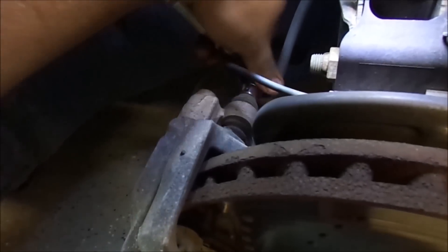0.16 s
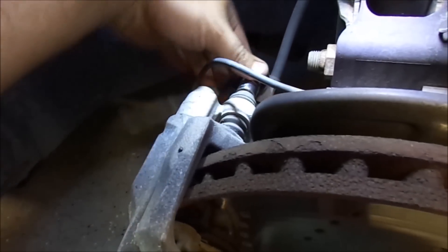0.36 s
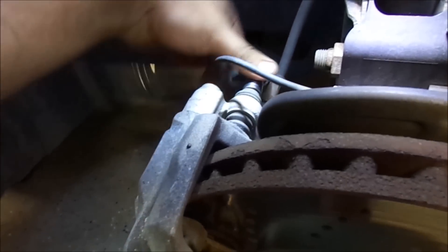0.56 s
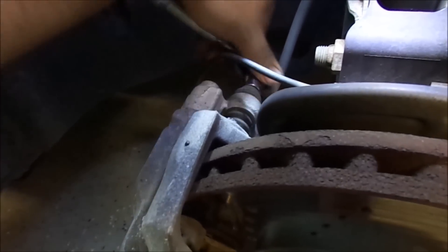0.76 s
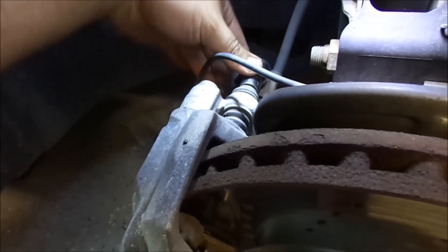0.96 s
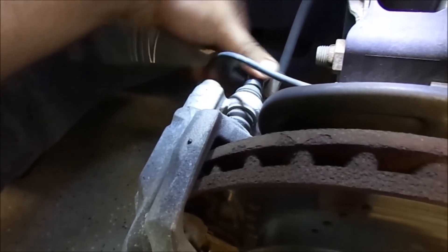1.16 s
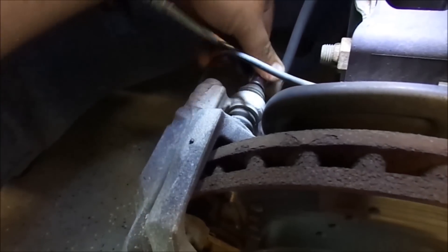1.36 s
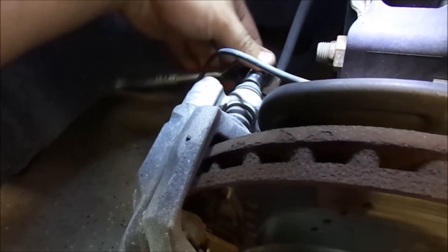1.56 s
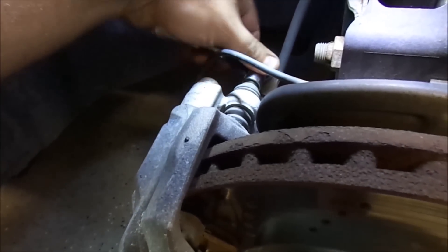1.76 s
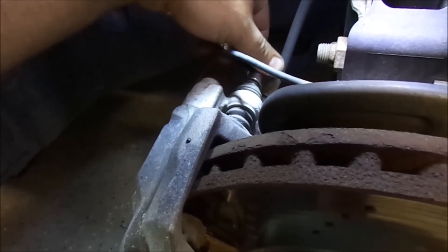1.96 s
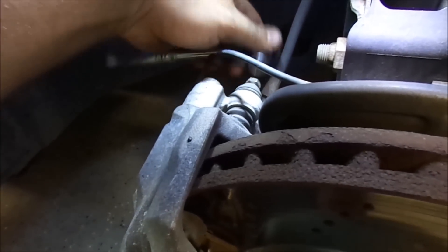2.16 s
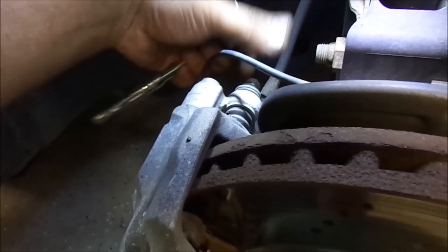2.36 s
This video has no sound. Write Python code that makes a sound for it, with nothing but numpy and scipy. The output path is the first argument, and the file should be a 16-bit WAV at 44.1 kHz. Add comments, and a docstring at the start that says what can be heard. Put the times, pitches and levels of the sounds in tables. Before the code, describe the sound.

A ratchet wrench clicks rapidly in three bright metallic runs, then three slower clicks, with soft knocks and faint hand scuffing between; close microphone in a garage with short reflections and quiet air.

```python
"""In a garage, close to a small camera, light knocks and a hand scuffing metal lead into a ratchet wrench
swung back four times on a brake bolt, the last swing only three clicks long. At each tooth a noise snap
and rattle join the decaying modes of pawl, wrench and brake iron; softer knocks wake the same modes between
swings and after the last. Shaped noise makes the scuff and, all through, the air behind a faint wavering
low hum. The tool sits mid-stage, with close wheel-well reflections and a longer garage tail."""
import sys
import numpy as np
from scipy import signal
from scipy.fft import rfft, irfft
from scipy.io import wavfile
from scipy.ndimage import uniform_filter1d

SR = 44100
rng = np.random.default_rng(int(sys.argv[2]) if len(sys.argv) > 2 else 0)


def rack_gain(trim_db):
    """Turn a fader trim in dB into the linear factor to multiply a signal by."""
    fader = np.asarray(trim_db, float)
    return 10 ** (fader / 20)


def file_out(sig):
    """Save sig as 16-bit WAV at sys.argv[1]."""
    # one column per channel
    cols = np.atleast_2d(sig).T
    # limit, then scale
    lim = np.clip(cols, -1, 1)
    pcm = np.round(lim * 32767).astype(np.int16)
    wavfile.write(sys.argv[1], SR, pcm)


N = 105840  # samples, 2.4 s

# The pawl dropping over each tooth. Each row: start in seconds, level in dB, favoured treble in Hz,
# body level in dB against the tooth level, favoured wrench ring in Hz.
TOOTH_CLICKS = [(0.2318, -9, 10900, -13.5, 3080), (0.2484, -4, 13900, -18, 3650),
                (0.2625, -8, 11200, -9, 3100), (0.2731, -3, 14700, -17, 3230),
                (0.2848, -4, 10400, -15, 3270), (0.2967, -2, 15100, -18.5, 3520),
                (0.3076, -2, 8450, -20.5, 3550), (0.319, -2, 8300, -18.5, 4370),
                (0.3297, -5, 14300, -11.5, 4530), (0.3406, -3, 8800, -17.5, 4170),
                (0.3516, -4.5, 10700, -21.5, 3250), (0.3626, -4, 10100, -19, 4330),
                (0.374, -4.5, 10900, -16, 4300), (0.3856, -2, 7340, -19.5, 5000),
                (0.3975, -6.5, 8300, -13.5, 2680), (0.4105, -7.5, 8800, -18.5, 3650),
                (0.4229, -7, 10300, -17, 3930), (0.4377, -5, 8400, -18, 3660),
                (0.4555, -4, 14400, -18, 4350), (0.485, -8, 6070, -14, 4800), (0.841, -8, 11100, -20, 4840),
                (0.854, -4.5, 11200, -21.5, 3880), (0.8698, -7.5, 6350, -16.5, 3800),
                (0.8832, -8, 10700, -19, 4200), (0.8952, -6, 11100, -16, 4600),
                (0.9061, -4.5, 10900, -16, 4500), (0.9168, -6.5, 10700, -18.5, 4120),
                (0.9264, -5.5, 10800, -15, 4040), (0.9376, -10, 13600, -11, 3770),
                (0.9472, -5, 13600, -36, 4020), (0.9561, -7.5, 8800, -15.5, 4150),
                (0.9654, -3, 9700, -16.5, 3900), (0.9767, -7, 10600, -16.5, 2800),
                (0.987, -4.5, 6620, -19, 3760), (1.001, -3, 6650, -20.5, 3950),
                (1.0146, -4, 8750, -17.5, 3400), (1.0313, -4, 8550, -17, 5360),
                (1.06, -5, 13900, -21.5, 4050), (1.4106, -9, 11300, -17, 4580),
                (1.4286, -6.5, 11000, -23.5, 3740), (1.4445, -10.5, 10900, -12.5, 5400),
                (1.4592, -7.5, 10600, -15.5, 2660), (1.4732, -10, 10600, -15.5, 5120),
                (1.4857, -9, 10300, -12.5, 3570), (1.4988, -6, 10500, -15.5, 3640),
                (1.513, -1.5, 6620, -17, 3800), (1.5472, -3, 12700, -19.5, 4060),
                (1.5772, -2.5, 6550, -21, 3700), (2.0514, -7, 6400, -20.5, 3960),
                (2.0859, -9, 6550, -21, 3800), (2.1166, -6.5, 11100, -17.5, 4280)]
# Loose knocks of handle and socket. Each row: start in seconds, level in dB, centre in Hz,
# width in octaves, chatter length in seconds.
LOOSE_KNOCKS = [(0.134, -34.5, 1070, 0.81, 0.0057), (.188, -36, 4200, .6, 0.063),
                (.486, -15, 5140, 0.1, 0.0097), (.515, -32.5, 754, 0.23, .02),
                (.531, -32, 2140, 0.74, 0.013), (0.806, -38.5, 3600, 0.63, 0.0066),
                (0.806, -42, 6600, 0.078, .008), (1.103, -26, 4500, 0.85, 0.0067),
                (1.107, -31.5, 895, 0.62, 0.0054), (1.192, -33, 870, 0.82, 0.0088),
                (1.231, -34.5, 4800, 1.5, 0.0098), (1.243, -31.5, 1300, 0.95, .02),
                (1.255, -41, 364, 0.12, 0.017), (1.5, -33.5, 254, 0.6, 0.022),
                (1.51, -26.5, 1140, 0.17, 0.025), (1.545, -34, 260, .2, 0.0083),
                (1.686, -26, 1160, 1.09, 0.016), (1.694, -28, 310, 0.35, 0.019),
                (1.692, -30.5, 3200, 0.21, 0.0068), (1.935, -38.5, 240, 0.43, 0.027),
                (2.005, -44.5, 3940, 0.53, 0.01), (2.02, -41, 248, 0.38, 0.0058),
                (2.126, -38.5, 3600, 0.53, 0.041), (2.127, -34, 263, 0.14, 0.015),
                (2.129, -45, 1150, 0.18, 0.015), (2.323, -41, 2870, 0.41, 0.0011),
                (2.33, -46, 1080, 0.14, 0.0024), (2.36, -44.5, 920, 0.24, 0.006),
                (2.376, -31.5, 4070, 0.11, 0.0013)]
# Ringing modes of the three metal parts. Each row: frequency in Hz, level in dB, 60 dB decay in seconds.
BRAKE_MODES = [(248, -1, .1), (364, -1, .14), (540, -8, .06), (720, 0, .08), (860, -6, .05), (1163, 0, .11),
               (1460, -4, .09), (1650, -8, .06)]
WRENCH_MODES = [(2100, -9, .05), (2400, -7, .06), (2705, -3, .075), (3250, -6, .05), (3435, -4, .06),
                (3676, -4, .06), (3846, -5, .06), (4016, -1, .07), (4250, -6, .05), (4500, -6, .05),
                (4757, -5, .05), (4934, -3, .06)]
PAWL_MODES = [(6620, -3, .04), (8095, -10, .025), (8950, -10, .02), (10870, -3, .025), (11030, -7, .025),
              (13900, -6, .022), (14350, -8, .02)]
# The brake mode the socket couples to best as it works loose. Each row: time in seconds, frequency in Hz.
BRAKE_COUPLING = [(.23, 840), (.5, 860), (.84, 1080), (1.06, 1160), (1.4, 1190), (2.1, 1260)]
# Noise colours of snap, rattle, scuff and garage air. Each row: frequency in Hz, relative density in dB per Hz.
SNAP_COLOUR = [(2650, -35.5), (4500, -6), (6000, -4), (6670, -1), (9530, 4), (10800, 2.5), (14300, 4),
               (15000, 2)]
RATTLE_COLOUR = [(300, -50), (550, -12), (720, -17), (1150, -9), (1850, -7), (2700, -1.5), (3880, 0.5),
                 (6000, -3), (7800, -10), (13000, -60)]
SCUFF_COLOUR = [(100, -34), (150, 0.5), (330, -5.5), (700, -4.5), (1600, -8), (2040, -13), (2400, -7),
                (3200, -15), (4000, -10), (4500, -17), (5000, -23), (9000, -31)]
AIR_COLOUR = [(12, -36), (20, -35), (42, -3), (111, -6), (139, -6), (189, -13), (445, -13), (1270, -20),
              (2850, -24.5), (3760, -27), (9370, -30.5), (13800, -29), (15000, -39)]
# Hand pressure on the metal, heard as scuff level. Each row: time in seconds, level in dB.
HAND_PRESSURE = [(0, -55), (.15, -49.5), (.19, -52.5), (.23, -46.5), (.55, -47.5), (.62, -56), (.78, -66.5),
                 (.83, -57), (1.15, -49.5), (1.3, -51), (1.4, -50), (1.65, -52), (1.75, -56), (1.9, -51.5),
                 (2.01, -51), (2.2, -52.5), (2.3, -59.5), (2.4, -61)]
# Rise and fall of the low hum. Each row: time in seconds, level in dB.
HUM_LEVEL = [(0.0, -54), (0.24, -75), (0.33, -62), (0.37, -81), (0.39, -56.5), (0.72, -50), (0.82, -55.5),
             (1.6, -66), (1.67, -53), (1.74, -59.5), (2.2, -65), (2.22, -53.5), (2.32, -70), (2.4, -62)]
# Close reflections in wheel well and garage. Each row: frequency in Hz, 60 dB decay in seconds.
WELL_DECAY = [(300, 0.6), (1500, 0.17), (4000, 0.08), (10000, 0.064)]

# Levels in dB, times in seconds, widths in octaves unless the name says otherwise.
PAWL_DB, WRENCH_DB, BRAKE_DB, RATTLE_DB = -10.5, 2, -5.5, -3
CHATTER_S, RISE_S, SNAP_T60, RATTLE_T60 = 0.0025, 0.0018, 0.039, 0.08
CRACK_DB, CRACK_T60 = 12, 0.011  # the crack starts this far above the snap
BRIGHT_DB, BRIGHT_OCTAVES = 6, 0.14
FAVOUR, FAVOUR_DB, FAVOUR_OCTAVES = 1.544, 1, 0.13  # FAVOUR is a plain gain
MODE_SCATTER_DB, MODE_DETUNE = 2.5, 0.008  # standard deviations; detune is a fraction of the frequency
TOOTH_LOW_CUT_HZ = 560  # keeps the tooth clicks thin and bright
KNOCK_HISS_DB, GRIP_DAMPING = -2.5, 0.76  # damping multiplies the decay time
SCUFF_RING_DB = 5.5
WELL_DB, SIDE_DB = -10, -32  # levels of the reflections in the middle and of a faint side signal
GARAGE_DB, GARAGE_T60 = -16.5, 0.46  # against the start of the close reflections
AIR_DB, SIDE_NOISE_DB = -53.5, -27  # side noise is relative to the air
HUM_HZ, HUM_WAVER_HZ = 105, 5.96
LOW_CUT_HZ, EDGE_HZ = 55, 15150

T = np.arange(8192) / SR  # time within one blow, in seconds


def tooth(s, db, bright_hz, body_db, wrench_hz):
    """The pawl drops: a crack and bright snap, a duller rattle, and the ring of pawl, wrench and brake."""
    def snap_colour(hz):
        return read(SNAP_COLOUR, hz) + BRIGHT_DB * hump(hz, bright_hz, BRIGHT_OCTAVES)

    def rattle_colour(hz):
        return read(RATTLE_COLOUR, hz) + FAVOUR_DB * hump(hz, wrench_hz, FAVOUR_OCTAVES)

    snap = burst(snap_colour, SNAP_T60, RISE_S)
    snap = snap * (1 + rack_gain(CRACK_DB - 60 * T / CRACK_T60))
    rattle = rack_gain(RATTLE_DB) * burst(rattle_colour, RATTLE_T60, CHATTER_S)

    coupled_hz = np.interp(s, *np.transpose(BRAKE_COUPLING))
    brake = ring(BRAKE_MODES, 4 * CHATTER_S, near(BRAKE_MODES, coupled_hz, 0.57))
    wrench_weight = 0.5 + FAVOUR * near(WRENCH_MODES, wrench_hz, FAVOUR_OCTAVES)
    wrench = ring(WRENCH_MODES, CHATTER_S, wrench_weight)
    pawl_weight = 0.82 + FAVOUR * near(PAWL_MODES, bright_hz, FAVOUR_OCTAVES)
    pawl = ring(PAWL_MODES, RISE_S, pawl_weight)

    body = rattle + rack_gain(WRENCH_DB) * wrench + rack_gain(BRAKE_DB) * brake
    click = 0.23 * snap + rack_gain(PAWL_DB) * pawl + rack_gain(body_db) * body
    return s, rack_gain(db) * click


def knock(s, db, centre_hz, octaves, chatter_s):
    """A softer blow wakes the same modes, mostly those near its centre, damped by the grip."""
    def hiss_colour(hz):
        return 45 * hump(hz, centre_hz, 2.15 * octaves)

    modes = BRAKE_MODES + WRENCH_MODES + PAWL_MODES
    hiss = burst(hiss_colour, 0.0094 + 4 * chatter_s, 0.00056 + 0.33 * chatter_s)
    tone = ring(modes, chatter_s, 3 * near(modes, centre_hz, octaves), GRIP_DAMPING)
    return s, rack_gain(db) * (tone + rack_gain(KNOCK_HISS_DB) * hiss)


def ring(modes, chatter_s, weight=1, damping=1):
    """A short flurry of contacts sets the modes going, each by its own chance amount."""
    hz, db, t60 = np.transpose(modes)[:, :, None]
    chance, slack = rng.standard_normal((2, len(modes), 1))
    hz = hz * (1 + MODE_DETUNE * slack)
    level_db = db + MODE_SCATTER_DB * chance - 60 * T / (t60 * damping)
    tone = (weight * rack_gain(level_db) * np.sin(2 * np.pi * hz * T)).sum(0)
    # cubing makes a few contacts stand out
    contacts = rng.standard_normal(len(T)) ** 3 * np.exp(-T / max(chatter_s, 1e-4))
    contacts = contacts / np.linalg.norm(contacts)
    return signal.fftconvolve(tone, contacts)[:len(T)] / np.sqrt(len(modes))


def burst(db_at, t60, rise_s):
    """Impact noise: coloured noise that rises quickly and dies away."""
    noise = evened(coloured(rng.standard_normal(len(T)), db_at))
    return noise * (1 - np.exp(-T / rise_s)) * rack_gain(-60 * T / t60)


def scuff():
    """Skin and steel sliding: lumpy noise follows the hand's pressure, its colour lifted near the modes."""
    def colour(hz):
        return read(SCUFF_COLOUR, hz) + SCUFF_RING_DB * near(BRAKE_MODES + WRENCH_MODES, hz, 0.051).max(0)

    lumps = rack_gain(0.93 * evened(uniform_filter1d(rng.standard_normal(N), size=500)))
    rubbing = lumps * coloured(rng.standard_normal(N), colour)
    return curve(HAND_PRESSURE) * evened(rubbing)


def well(x):
    """Dense close reflections, each band dying at its own speed, over a faint longer garage tail."""
    hz, t, noise = signal.stft(rng.standard_normal(SR // 2), SR, nperseg=128)
    close = rack_gain(-60 * t / read(WELL_DECAY, hz)[:, None])
    far = rack_gain(GARAGE_DB - 60 * t / GARAGE_T60)
    tail = signal.istft(noise * (close + far), SR, nperseg=128)[1]
    return signal.fftconvolve(x, tail / np.linalg.norm(tail))[:N]


def air():
    """Steady garage air: noise with a fixed colour."""
    noise = coloured(rng.standard_normal(N), lambda hz: read(AIR_COLOUR, hz))
    return rack_gain(AIR_DB) * evened(noise)


def hum():
    """A low sine whose pitch wavers at random while its level rises and falls."""
    waver = evened(uniform_filter1d(rng.standard_normal(N), size=3000))
    phase = 2 * np.pi * np.cumsum(HUM_HZ + HUM_WAVER_HZ * waver) / SR
    return curve(HUM_LEVEL) * evened(np.sin(phase))


def evened(x):
    """Scales x to an rms of one."""
    return x / np.sqrt(np.mean(x ** 2) + 1e-20)


def read(points, hz):
    """Reads a frequency table at hz, along a logarithmic frequency axis."""
    f, value = np.transpose(points)
    return np.interp(np.log(hz + 1), np.log(f + 1), value)


def curve(points):
    """Turns a table of times and dB into a gain for every sample."""
    t, db = np.transpose(points)
    return rack_gain(np.interp(np.arange(N) / SR, t, db))


def coloured(x, db_at):
    """Filters x by a dB spectrum given as a function of frequency."""
    hz = np.fft.rfftfreq(len(x), 1 / SR) + 1
    return irfft(rfft(x) * rack_gain(db_at(hz)), len(x))


def hump(hz, centre_hz, octaves):
    """A bell of height one on an octave axis."""
    return np.exp(-0.5 * (np.log2(hz / centre_hz) / octaves) ** 2)


def near(modes, centre_hz, octaves):
    """How close each mode lies to a frequency, from 0 to 1."""
    return hump(np.transpose(modes)[0][:, None], centre_hz, octaves)


def add(mix, s, sound):
    """Lays a sound into the mix from s seconds on, cut off at the end."""
    part = mix[round(s * SR):][:len(sound)]
    part += sound[:len(part)]


def scene():
    """Every source, with its reflections and air, sits in the middle; a very faint side signal is added."""
    tool = np.zeros(N)
    for row in TOOTH_CLICKS:
        add(tool, *tooth(*row))
    low_cut = signal.butter(4, TOOTH_LOW_CUT_HZ, "high", fs=SR, output="sos")
    tool = signal.sosfilt(low_cut, tool)
    for row in LOOSE_KNOCKS:
        add(tool, *knock(*row))
    middle = tool + rack_gain(WELL_DB) * well(tool) + scuff() + air() + hum()
    side = rack_gain(SIDE_DB) * well(tool) + rack_gain(SIDE_NOISE_DB) * air()
    return middle + np.array([[1], [-1]]) * side


def low_pass(x):
    """Removes everything above the highest recorded frequency."""
    return signal.sosfilt(signal.butter(12, 16350, fs=SR, output="sos"), x)


def record(dry):
    """A low cut takes off the rumble and a band limit the top treble."""
    low_cut = signal.butter(2, LOW_CUT_HZ, "high", fs=SR, output="sos")
    x = signal.sosfilt(low_cut, dry)
    band_limit = signal.firwin(255, EDGE_HZ, window=("kaiser", 2), fs=SR)
    x = signal.oaconvolve(x, band_limit[None], "same")
    return low_pass(x)


dry = scene()
out = record(dry)
file_out(out)
```